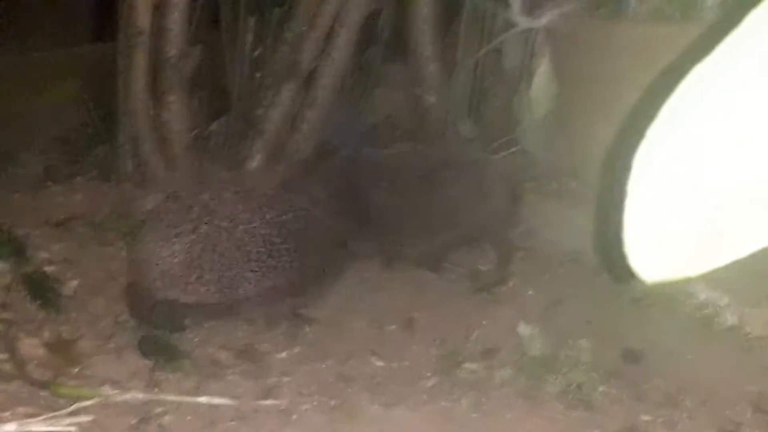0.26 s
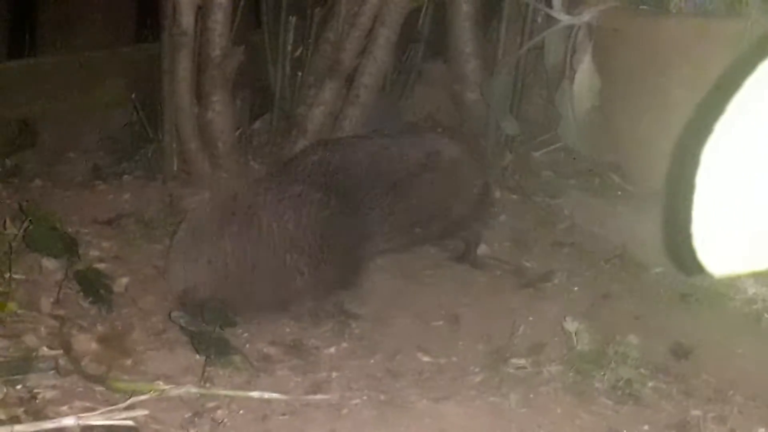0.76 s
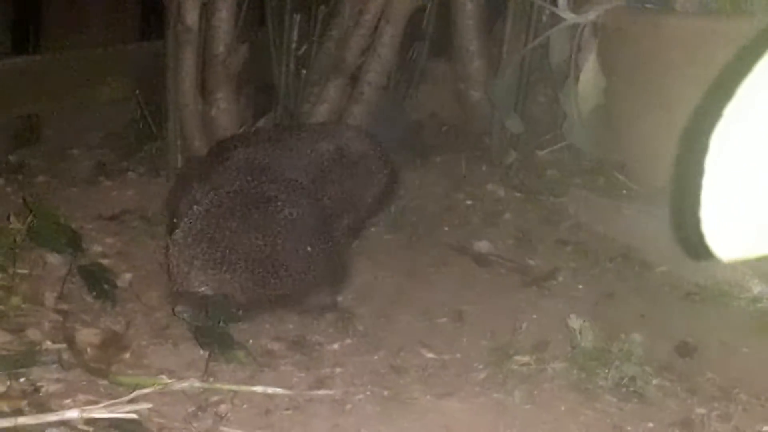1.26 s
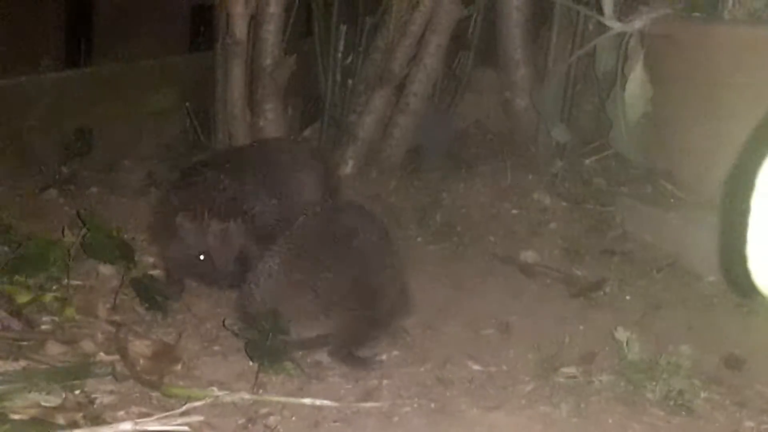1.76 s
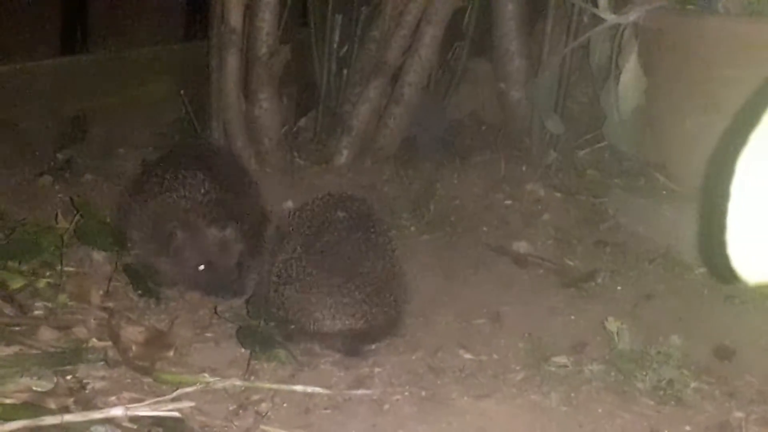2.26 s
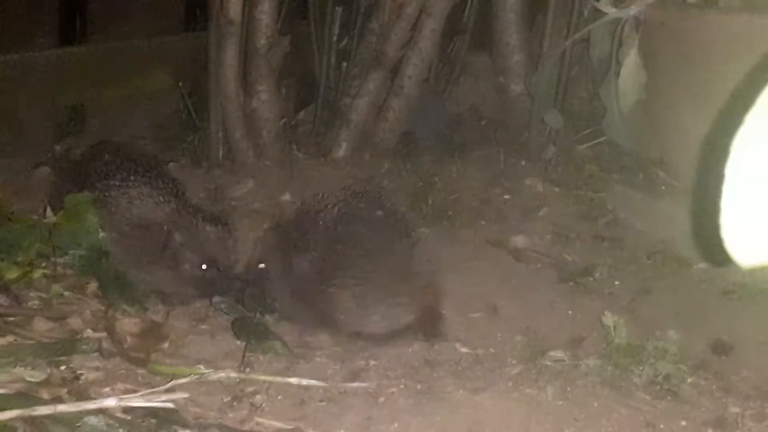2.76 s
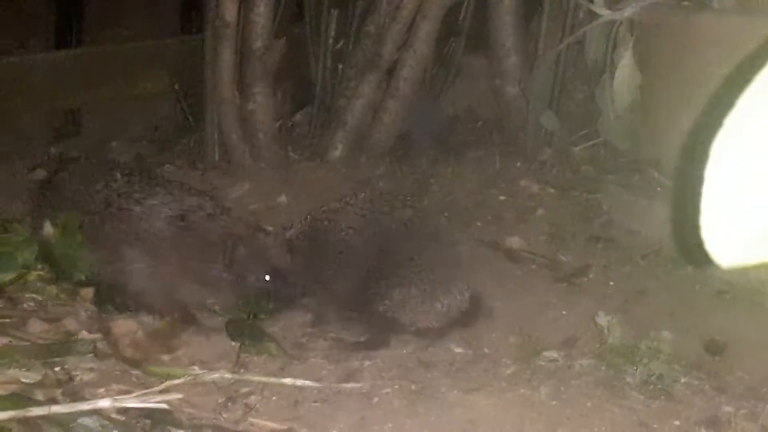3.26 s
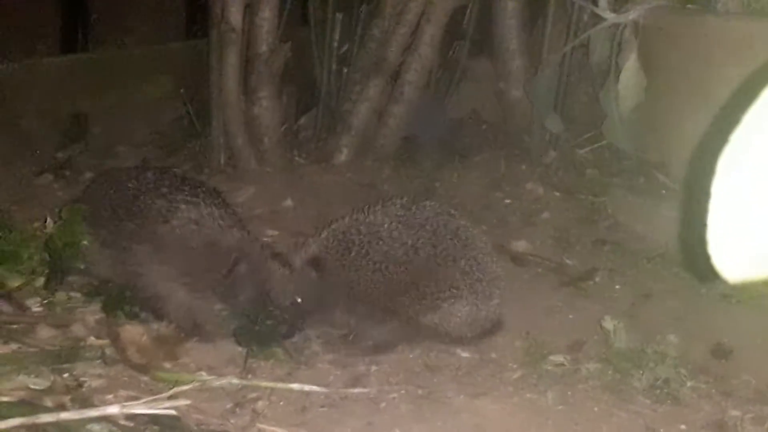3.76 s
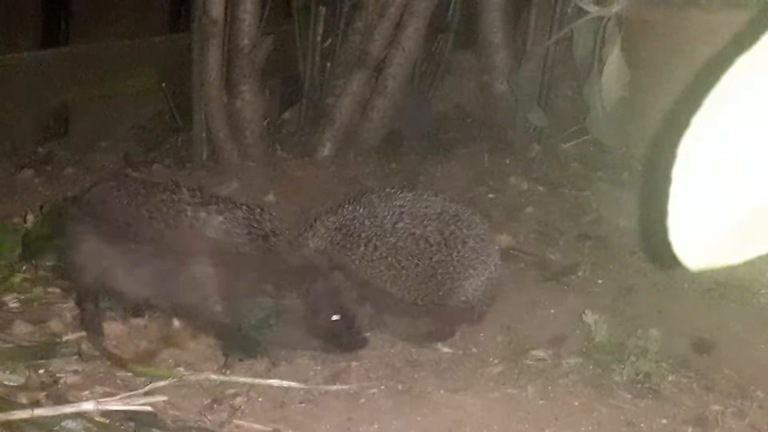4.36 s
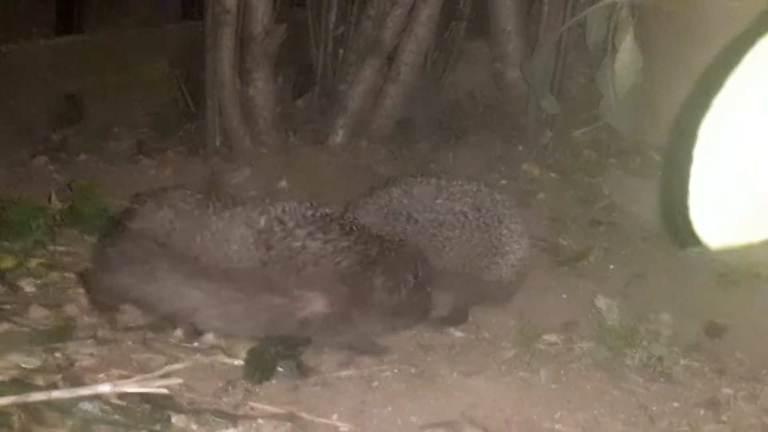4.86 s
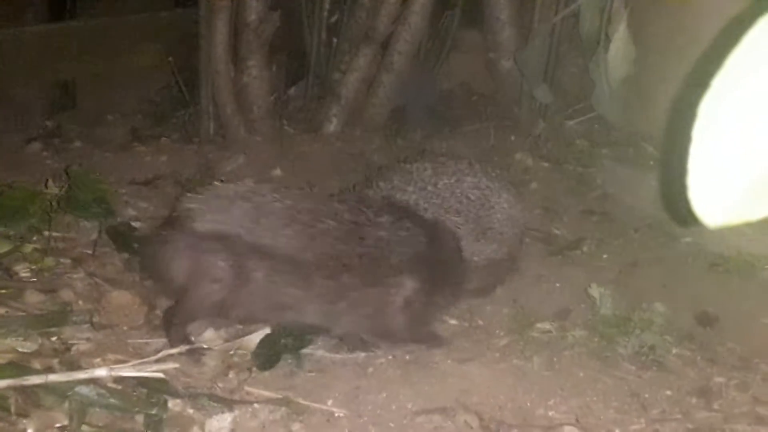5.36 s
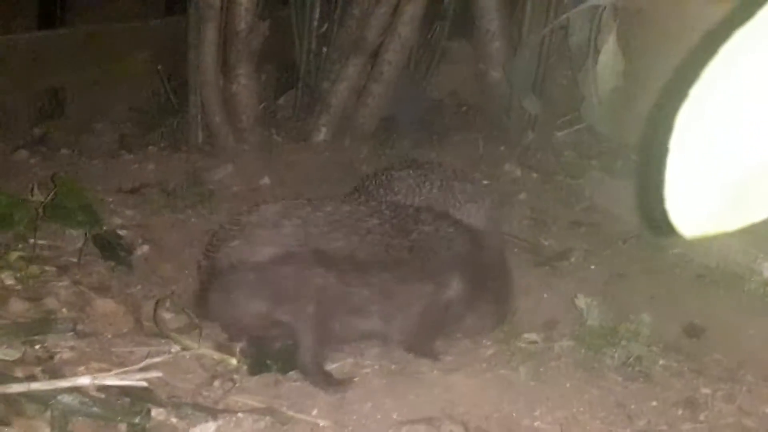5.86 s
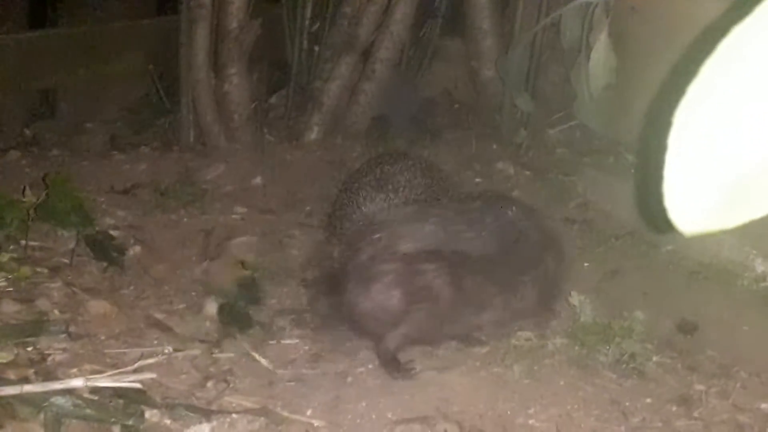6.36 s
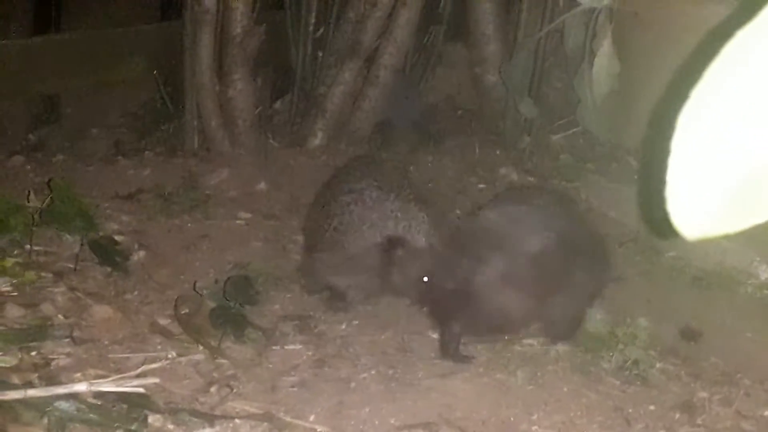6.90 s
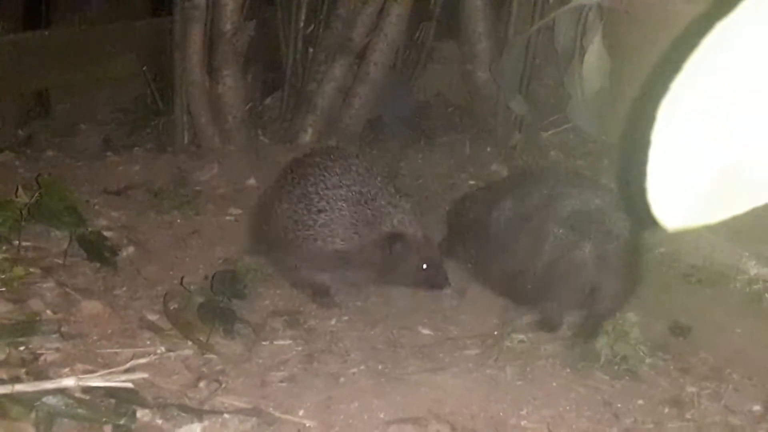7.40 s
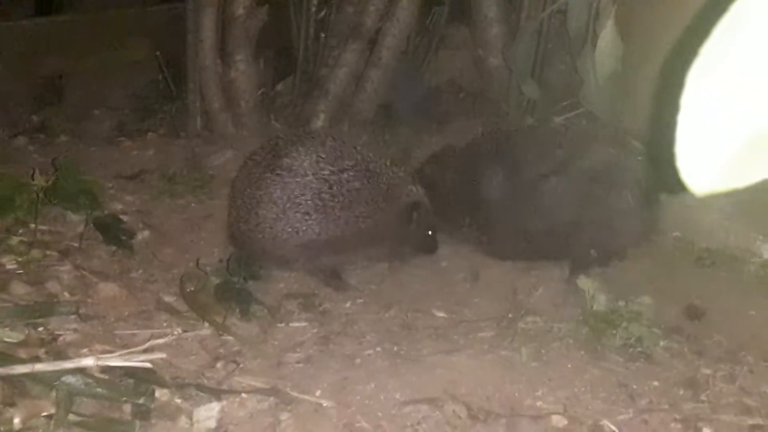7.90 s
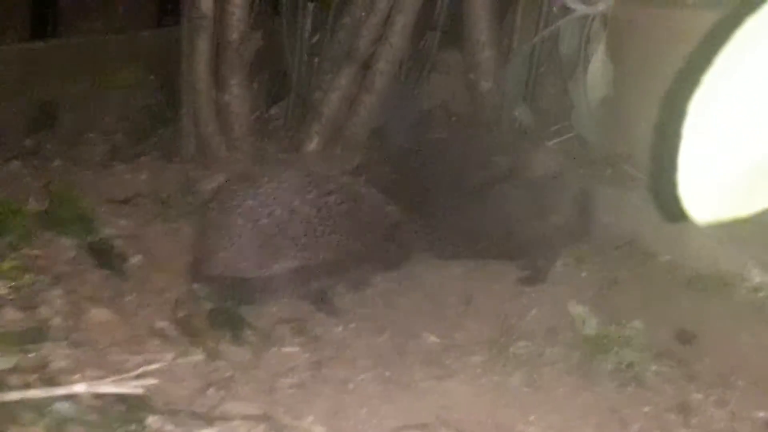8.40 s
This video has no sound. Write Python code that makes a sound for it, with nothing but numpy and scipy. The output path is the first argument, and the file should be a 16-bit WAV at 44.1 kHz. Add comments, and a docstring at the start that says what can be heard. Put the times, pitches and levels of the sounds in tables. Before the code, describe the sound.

Short, hissy hedgehog snorts repeat about three times a second outdoors, over a faint distant rumble and an occasional twig crack.

```python
"""Garden at night: two hedgehogs circle each other, one huffing about three times a second.
Each huff is a jet of air through the nostrils, with a hollow puff under the hiss; thin sniffs come
between. Feet stir dry leaves and snap a twig, spines brush stems, soil and stems take soft knocks.
A fence and a flowerpot echo faintly over a distant rumble and machine hum."""
import sys
import numpy as np
from scipy import signal
from scipy.fft import rfft, irfft
from scipy.io import wavfile
from scipy.ndimage import map_coordinates

SR = 44100
rng = np.random.default_rng(int(sys.argv[2]) if len(sys.argv) > 2 else 0)


def wav_out(sig):
    """Save sig, one row per channel (or a flat mono array), as 16-bit PCM at SR to the path in sys.argv[1]."""
    wavfile.write(sys.argv[1], SR, np.round(np.clip(np.atleast_2d(sig).T, -1, 1) * 32767).astype(np.int16))


N = 381024
TIME_S = np.arange(N) / SR
NOSTRIL_HZ = 3785  # centre of the nostril, whistle and sniff colours

# machine hum: harmonic number, level/dB
HUM_HARMONICS = [(1, -74.5), (2, -72), (3, -73), (4, -68.5), (5, -79.5), (6, -69)]
# feet in leaf litter: start t/s, end t/s, level/dB
FOOT_SHUFFLES = [(0.017, 0.127, -73.5), (.73, .8, -71), (2.92, 2.96, -76), (3.278, 3.3, -54.5),
                 (3.31, 3.41, -72), (3.557, 3.64, -65), (4.24, 4.31, -68), (5.44, 5.465, -62),
                 (5.48, 5.56, -60), (5.69, 5.78, -67), (6.25, 6.33, -78), (7.815, 7.84, -66)]
# leaves and twigs breaking: t/s, level/dB
CRACK_EVENTS = [(0.045, -49), (0.79, -45.5), (3.2944, -38.5), (3.352, -46), (5.1966, -48), (5.446, -46),
                (5.4595, -46), (5.4972, -42), (5.69, -28), (5.696, -32.5), (5.7388, -37.5), (7.8233, -45)]
# huffs: start t/s, length/s, hiss level/dB, nostril resonance f/Hz
HUFF_EVENTS = [(0.162, 0.089, -50.5, 3980), (0.467, 0.076, -56, 3840), (0.691, 0.043, -46, 3880),
               (1.012, 0.077, -49, 3910), (1.348, 0.073, -46.5, 3880), (1.706, 0.081, -49, 3770),
               (2.025, 0.067, -50.5, 3610), (2.398, 0.067, -50, 3780), (2.772, 0.08, -50, 3670),
               (3.168, 0.08, -52.5, 3590), (3.496, 0.078, -45, 3720), (3.818, 0.08, -48, 3550),
               (4.114, 0.056, -46.5, 3680), (4.442, 0.049, -52.5, 3500), (4.675, 0.07, -52, 3720),
               (5.041, 0.049, -54, 3700), (5.348, 0.073, -52.5, 3870), (5.625, 0.055, -46.5, 3900),
               (5.875, 0.056, -50.5, 3820), (6.183, 0.057, -49.5, 3930), (6.481, 0.057, -48.5, 3740),
               (6.753, 0.074, -43, 3880), (7.089, 0.068, -45.5, 3830), (7.392, 0.064, -43, 3830),
               (7.715, 0.073, -44.5, 3930), (8.07, 0.069, -46.5, 3730), (8.417, 0.074, -45, 4060)]
# sharp edge of an ordinary huff over the scene: t/s, level/dB
EDGE_CURVE = [(0.15, -64.5), (1.9, -76), (2.4, -72), (2.8, -78), (3.9, -71), (5.5, -66.5), (7.1, -68),
              (8.1, -61), (8.45, -66)]
# rasp of an ordinary huff over the scene: t/s, level/dB
RASP_CURVE = [(0, -64), (1.5, -58), (2.1, -83), (2.8, -82), (3.3, -67), (3.9, -69), (4.8, -61),
              (6.3, -61.5), (8.1, -72.5), (8.45, -62)]
# resonances behind the nostrils: f/Hz, width/Hz, level/dB re puff
CAVITY_MODES = [(617, 48, -14), (889, 48, -7.5), (1126, 41, -15)]
# knocks on soil and stems: t/s, f/Hz, level/dB, T60/s
KNOCK_EVENTS = [(0.69, 630, -33, 0.016), (1.39, 147, -32.5, .03), (1.478, 1660, -68, .06),
                (5.019, 1490, -53.5, 0.04)]
# sniffs: start t/s, end t/s, level/dB, resonance f/Hz
SNIFF_EVENTS = [(2.87, 2.97, -75, 3900), (3.01, 3.145, -76.5, 3970), (4.89, 5.0, -81, 4560),
                (5.117, 5.345, -70.5, 3480), (5.25, 5.353, -71, 3800)]
# spines on stems: start t/s, end t/s, level/dB
SPINE_BRUSHES = [(3.283, 3.303, -69), (3.515, 3.605, -77), (3.552, 3.575, -76), (5.735, 5.775, -82)]

# colours (relative spectra): f/Hz, level/dB
NIGHT_COLOUR = [(20, -41), (38, -17), (58, 0.5), (90, -6.5), (140, 0), (245, 0.5), (440, -11), (600, -6.5),
                (950, -7.5), (1170, -13.5), (1530, -29.5), (2600, -36), (3900, -36), (5500, -39),
                (8800, -42.5), (15500, -36.5)]  # night air
RUB_COLOUR = [(1500, -30), (2500, -18), (3100, -8.5), (3850, -3.5), (4450, -6.5), (5000, -19),
              (6300, -23.5), (8000, -40)]  # leaves rubbing
LEAF_COLOUR = [(600, -32), (1600, -21), (2500, -24), (3150, -12.5), (3950, -3), (4550, -9.5), (5200, -23),
               (6300, -31), (8000, -52), (15000, -40)]  # leaf breaking
BRITTLE_COLOUR = [(4500, -24), (6200, -8), (7600, -27), (9000, -34), (12500, -19), (14000, -8), (15100, -4),
                  (16500, -8)]  # top of a crack
NOSTRIL_COLOUR = [(2100, -34), (2550, -35), (2820, -5), (3250, 0), (3950, 4), (4550, -5), (5000, -11),
                  (5800, -35.5), (7000, -38)]  # nostril hiss
WHISTLE_COLOUR = [(3200, -40), (3660, -14), (3780, 5), (3900, -13), (4400, -46)]  # nostril whistle
EDGE_COLOUR = [(4200, -21), (5200, 5.5), (6000, 3.5), (6500, -4), (7200, -16), (9000, -28)]  # sharp edge of a huff
AIRY_COLOUR = [(7500, -7.5), (10000, -9.5), (12500, 0), (14000, -2), (15500, 0.5)]  # top of huffs and brushing spines
PUFF_COLOUR = [(42, -32), (80, -17), (180, 0), (450, -1), (650, -2), (920, 2), (1150, -2), (1400, -14),
               (1750, -31), (2500, -51)]  # hollow puff
RASP_COLOUR = [(1250, -14), (1600, -2.5), (1780, 1.5), (2050, 6.5), (2400, 5), (2900, 10), (4000, -20)]  # closing airway
SNIFF_COLOUR = [(2500, -29), (3150, -8), (3500, -4), (3780, 1), (4100, -8), (4500, -14), (5400, -32)]  # slow air in the nostrils
FIBRE_COLOUR = [(3000, -4), (4500, -2), (6300, 3), (8500, -19), (11000, -6), (15500, -6)]  # wood fibres tearing


def undb(db):
    """Decibels to gain."""
    return 10 ** (np.asarray(db) / 20)


def unit(x):
    """Scale to rms 1."""
    return x / np.sqrt(np.mean(x ** 2))


def colour_db(colour, hz):
    """Colour on a log axis; -20 dB/octave beyond its ends."""
    knot_hz, db = np.transpose(colour)
    octave, knots = np.log2(np.maximum(hz, 1)), np.log2(knot_hz)
    return np.interp(octave, knots, db) - 20 * np.abs(octave - np.clip(octave, knots[0], knots[-1]))


def noise(colour, size, shift=1):
    """Coloured noise, rms 1, frequencies times shift."""
    gain = undb(colour_db(colour, np.fft.rfftfreq(size, 1 / SR) / shift))
    return unit(irfft(rfft(rng.standard_normal(size)) * gain, size))


def ring(colour, size=1024):
    """Minimum-phase impulse response of a colour, peak 1."""
    cepstrum = irfft(np.log(undb(colour_db(colour, np.fft.rfftfreq(size, 1 / SR)))))
    cepstrum[1:size // 2] *= 2
    cepstrum[size // 2 + 1:] = 0
    response = irfft(np.exp(rfft(cepstrum)))
    return response / np.abs(response).max()


def walk(rate_hz, size):
    """Smooth random wander, spread 1."""
    steps = np.arange(size) * rate_hz / SR
    return map_coordinates(rng.standard_normal(4096), [steps], order=1, mode="wrap") * np.sqrt(3 / 2)


def add(track, start_s, sound):
    """Mix a sound into a track."""
    i = max(int(start_s * SR), 0)
    part = sound[:max(N - i, 0)]
    track[i:i + len(part)] += part


def gate(t, length_s, rise_s, fall_s):
    """Soft envelope, open from t = 0 to length_s."""
    return (1 + np.tanh(t / rise_s)) * (1 - np.tanh((t - length_s) / fall_s)) / 4


def far_tone(hz, db, waver_db=2.5, drift_hz=3.235):
    """Distant tone, wavering on its way through the air."""
    phase = 2 * np.pi * np.cumsum(hz + drift_hz * walk(18, N)) / SR
    return np.sqrt(2) * undb(db + waver_db * walk(9, N)) * np.sin(phase)


def night(air_db=-53.5, hum_hz=60.83, drone_hz=143.8, crest_s=6.21, rise_s=1.5, fall_s=.6):
    """Steady air and machine hum; something far off swells once, lifting rumble and a drone."""
    air = undb(air_db) * noise(NIGHT_COLOUR, N)
    low = signal.sosfiltfilt(signal.butter(2, 420, fs=SR, output="sos"), air)
    swell = np.exp(np.minimum((TIME_S - crest_s) / rise_s, (crest_s - TIME_S) / fall_s))
    rumble = low * undb(-.13 + swell + 1.06 * walk(8, N))
    wander_db = 1.4 * walk(1.5, N)
    hum = sum(far_tone(k * hum_hz, db + wander_db) for k, db in HUM_HARMONICS)
    drone = far_tone(drone_hz, -74 + 14.5 * swell)
    return air - low + rumble + hum + drone


def scrape(spans, colour, grains_per_s, spread_db, jerk_db, idle_db):
    """Dense tiny clicks in jerks, rising from an idle level in each span."""
    sizes = undb(spread_db * np.minimum(rng.exponential(size=N), 4)) * rng.choice([-1, 1], N)
    grains = sizes * (rng.random(N) < grains_per_s / SR)
    friction = signal.fftconvolve(grains, ring(colour))[:N] * undb(jerk_db * walk(70, N))
    motion = sum(undb(db) * gate(TIME_S - start, end - start, .014, .023) for start, end, db in spans)
    return unit(friction) * (undb(idle_db) + motion)


def feet():
    """Feet rub dry leaves."""
    return scrape(FOOT_SHUFFLES, RUB_COLOUR, grains_per_s=3200, spread_db=4, jerk_db=4.5, idle_db=-90)


def cracks(size=4096, wood_break_db=-38, crumble_s=.0072):
    """Breaks underfoot: one click, then a short crumble."""
    out, t = np.zeros(N), np.arange(size) / SR
    for start_s, db in CRACK_EVENTS:
        top_db = -33 + 2.1 * max(db - wood_break_db, 0)  # brighter once wood gives way
        click = undb(db - 3) * ring(LEAF_COLOUR) + undb(db + top_db) * ring(BRITTLE_COLOUR)
        crumble = undb(db - 16) * noise(RUB_COLOUR, size) * np.exp(-t / crumble_s)
        add(out, start_s + .00098, click)
        add(out, start_s + .001007, crumble)
    return out


def nostril_hiss(hz, t, sag=.0251, crest_width_s=.035, wander=.00792, whistle_db=-10):
    """Hiss and a randomly tuned whistle; resonances rise with pressure, cresting at t = 0."""
    size, shift = len(t), hz / NOSTRIL_HZ
    whistle = noise(WHISTLE_COLOUR, size, shift * np.exp(.15 * rng.uniform(-1.25, 1)))
    hiss = unit(noise(NOSTRIL_COLOUR, size, shift) + undb(whistle_db) * whistle)
    speed = 1 + sag * (np.exp(-(t / crest_width_s) ** 2) - .7) + wander * walk(39.6, size)
    return map_coordinates(hiss, [np.cumsum(speed)], order=3, mode="wrap")


def hollow_puff(size):
    """Broad puff plus narrow modes of the cavity behind the nostrils."""
    puff, modes = noise(PUFF_COLOUR, size), np.zeros(size)
    for hz, width_hz, db in CAVITY_MODES:
        resonator = signal.iirpeak(hz, hz / width_hz, fs=SR)
        modes += undb(db) * unit(signal.lfilter(*resonator, rng.standard_normal(size)))
    return puff + signal.sosfilt(signal.butter(4, 1300, fs=SR, output="sos"), modes)


def huffs(size=12288, lead_s=.06, usual_db=-48.5, usual_length_s=.068, flutter_hz=240, bounce=.35):
    """Sharp jets of air: turbulence rings nostrils and cavity; every part grows with effort."""
    out, t = np.zeros(N), np.arange(size) / SR - lead_s
    for start_s, length_s, db, hz in HUFF_EVENTS:
        effort_db = db - usual_db
        # pressure arches, peaking early or late; moist nostrils flutter
        lean_db = .97 * rng.uniform(-1, 1)
        progress = np.clip(2 * t / length_s - 1, -1, 1)
        pressure = undb(lean_db * progress - 2.5 * progress ** 2)
        jet = pressure * undb(.98 * walk(flutter_hz, size))
        hiss = undb(db + .7) * nostril_hiss(hz, t - length_s / 2)
        hiss *= gate(t + .0061, length_s + .006, .01, .01)
        # the edge needs full pressure, so starts later
        edge_db = np.interp(start_s, *np.transpose(EDGE_CURVE)) + .74 * effort_db
        edge = undb(edge_db) * noise(EDGE_COLOUR, size)
        airy = undb(-77.5 + .3 * effort_db) * noise(AIRY_COLOUR, size)
        top = (edge + airy) * gate(t, length_s + .0099, .013, .02)
        # short huffs puff harder
        puff_db = -52.5 + .59 * effort_db - 43 * (length_s - usual_length_s)
        puff = undb(puff_db) * hollow_puff(size) * gate(t + .017, length_s + .035, .0096, .024)
        puff *= undb(walk(328.3, size) - .13)  # sputter
        # rasp comes last, as the airway closes
        rasp_db = np.interp(start_s, *np.transpose(RASP_CURVE)) + .53 * effort_db
        rasp = undb(rasp_db) * noise(RASP_COLOUR, size) * gate(t - .005, length_s + .0056, .023, .014)
        huff = jet * (hiss + top + puff) + rasp
        # soil bounce varies as the snout moves
        lag = int(SR * rng.uniform(.0008, .003))
        add(out, start_s - lead_s, (huff + bounce * np.roll(huff, lag)) / np.hypot(1, bounce))
    return out


def knocks(size=4096):
    """Soft, quickly damped knocks on soil and stems."""
    out, t = np.zeros(N), np.arange(size) / SR
    for start_s, hz, db, t60_s in KNOCK_EVENTS:
        add(out, start_s, undb(db) * np.sin(2 * np.pi * hz * t) * np.exp(-np.log(1000) * t / t60_s))
    return out


def sniffs(flutter_db=3, flutter_hz=110):
    """Slow, halting air sounds only the middle of the nostril resonance."""
    out = np.zeros(N)
    for start_s, end_s, db, hz in SNIFF_EVENTS:
        flow = undb(db) * gate(TIME_S - start_s, end_s - start_s, .033, .018)
        out += flow * noise(SNIFF_COLOUR, N, hz / NOSTRIL_HZ)
    return out * undb(flutter_db * walk(flutter_hz, N))


def spines():
    """Spines brush stems."""
    return scrape(SPINE_BRUSHES, AIRY_COLOUR, grains_per_s=3500, spread_db=0, jerk_db=7, idle_db=-100)


def twig_snap(start_s=5.6957, snap_db=-23, fibre_db=-53, splinter_db=-52, size=4096):
    """One twig breaks through: very high click, tearing fibres, splinters."""
    out, t = np.zeros(N), np.arange(size) / SR
    click = undb(snap_db) * ring(BRITTLE_COLOUR)
    fibres = undb(fibre_db) * noise(FIBRE_COLOUR, size) * np.exp(-t / .013)
    splinter_decay = np.exp(-t / .0098) + .11 * np.exp(-t / .04)
    splinters = undb(splinter_db) * noise(BRITTLE_COLOUR, size) * splinter_decay
    add(out, start_s, click)
    add(out, start_s, fibres + splinters)
    return out


def garden_echo(dry, size=16384, wet_db=-15, t60_s=.22, delay_s=.004):
    """Thin, short scatter off fence, stems and pot."""
    t = np.arange(size) / SR
    tail = rng.standard_normal(size) * np.exp(-np.log(1000) * t / t60_s) * (t > delay_s)
    return dry + undb(wet_db) * signal.fftconvolve(dry, tail / np.linalg.norm(tail))[:N]


def scene():
    """Hedgehogs and echo over the night air, all centred."""
    hedgehogs = huffs() + sniffs() + cracks() + twig_snap() + feet() + spines() + knocks()
    mono = garden_echo(hedgehogs) + night()
    return np.array([mono, mono])


def record(dry, hiss_db=-83, low_cut_hz=36, high_cut_hz=16000):
    """Recorder: bass cut, faint wide treble hiss, steep top cut."""
    side = undb(hiss_db) * noise([(3000, -6.5), (7000, -4.5), (15500, -3.5)], N)
    thin = signal.sosfilt(signal.butter(2, low_cut_hz, "high", fs=SR, output="sos"), dry)
    lowpass = signal.ellip(10, .2, 70, high_cut_hz, fs=SR, output="sos")
    return signal.sosfilt(lowpass, thin + np.array([side, -side]))


dry = scene()
out = record(dry)
wav_out(out)
```